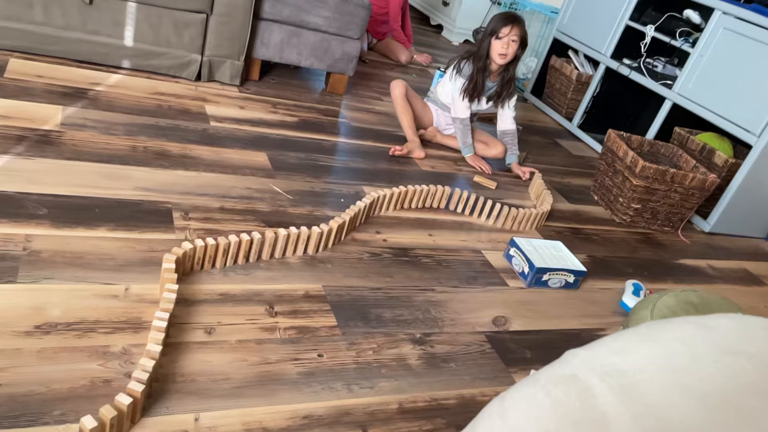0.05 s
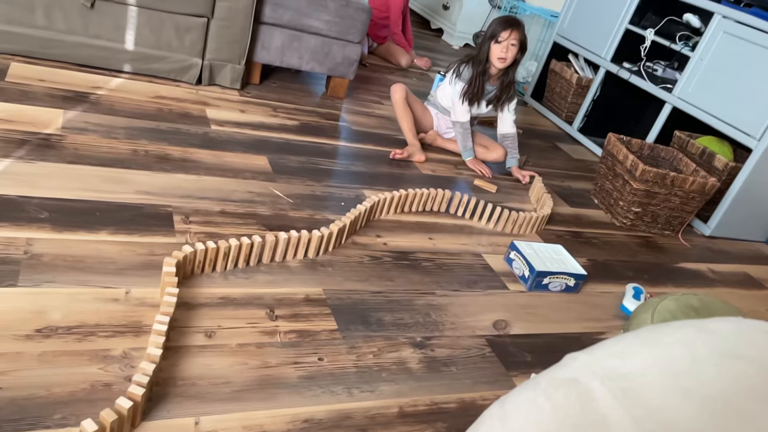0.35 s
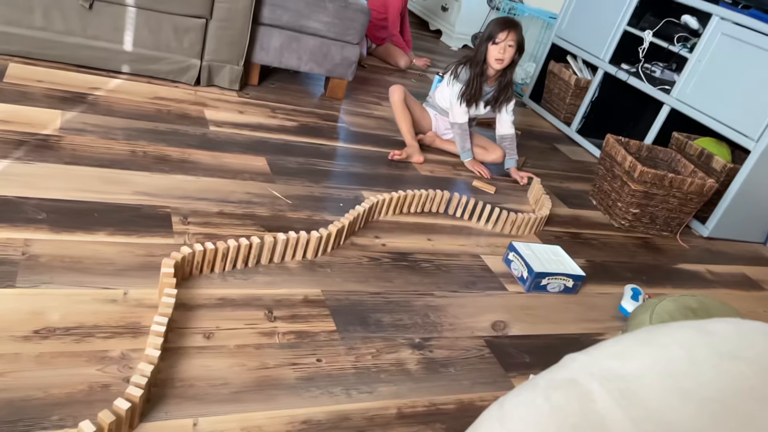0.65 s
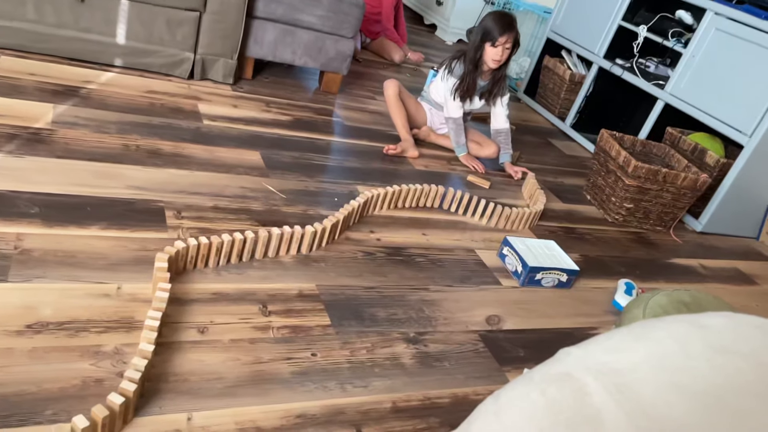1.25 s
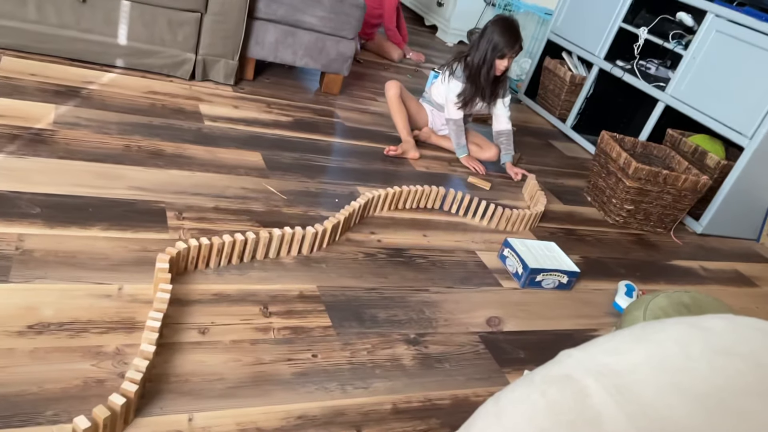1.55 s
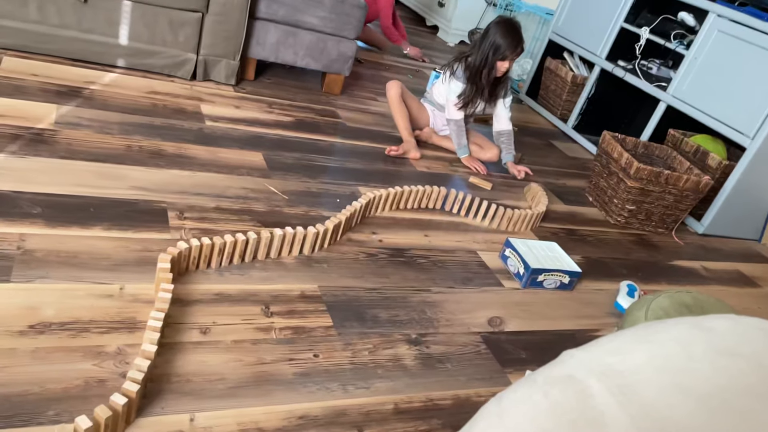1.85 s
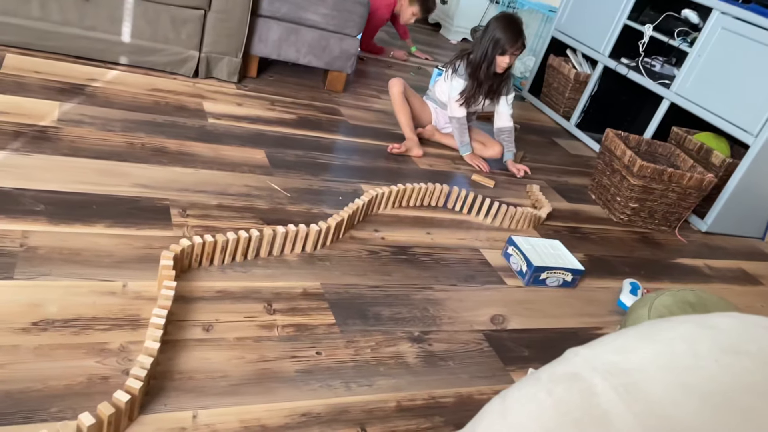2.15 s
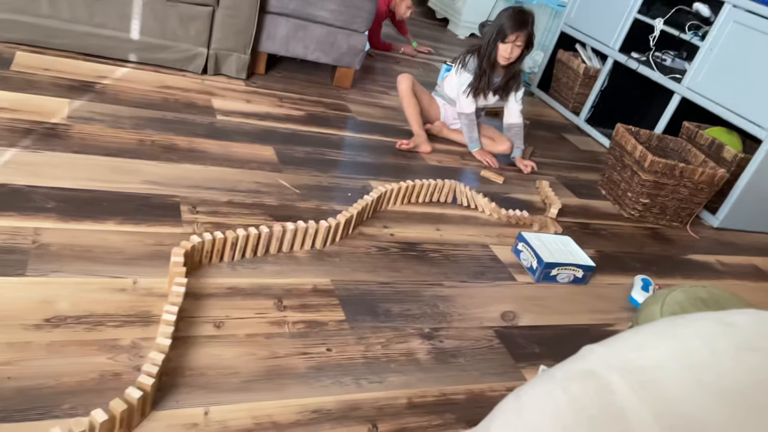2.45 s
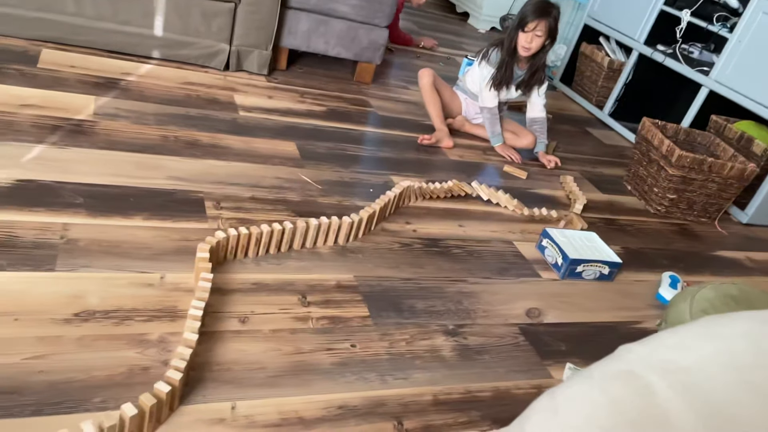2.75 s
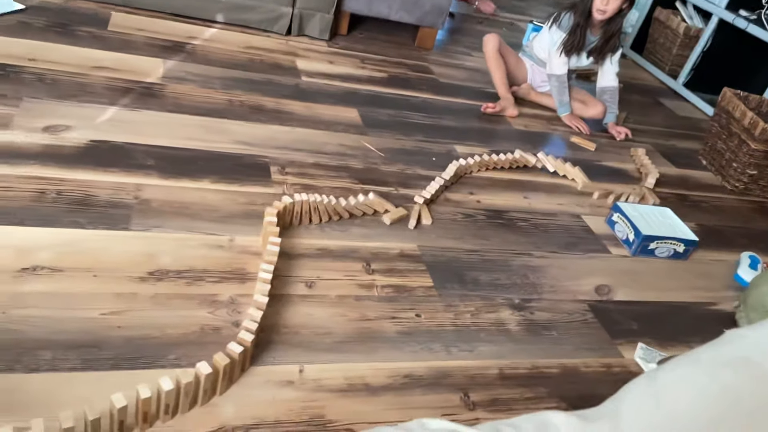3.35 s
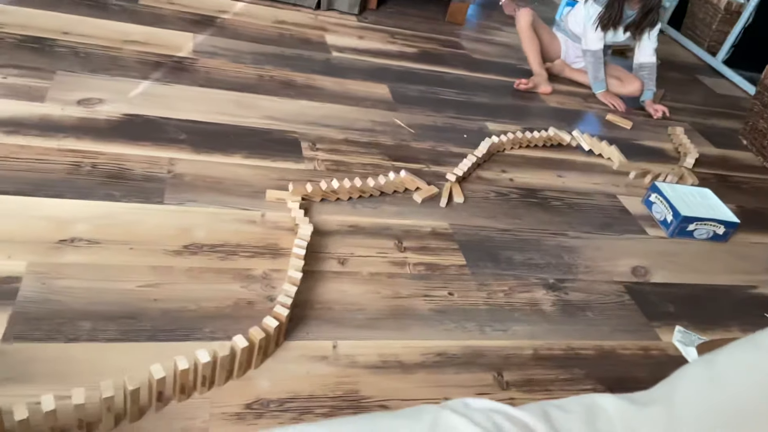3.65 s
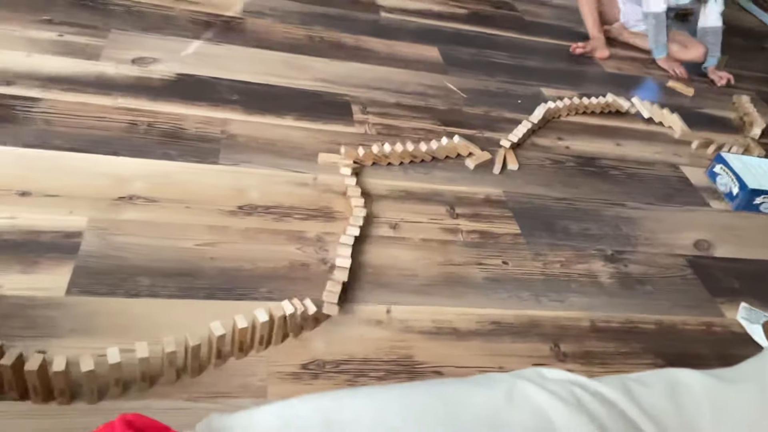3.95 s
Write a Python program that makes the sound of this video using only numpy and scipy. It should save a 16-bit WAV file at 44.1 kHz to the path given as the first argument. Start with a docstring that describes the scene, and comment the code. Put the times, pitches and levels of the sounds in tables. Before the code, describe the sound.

Wooden blocks topple in a row, clattering closer across a plank floor.

```python
"""A row of wooden blocks topples along a plank floor towards the listener in a quiet living room.
Each impact excites four damped resonances: thock of the planks, clack of the faces, ring of the block
and snap of an edge. Single knocks stand out of a growing clatter and turn drier as the row comes closer.
Far ticks come first; soft thumps, low booms and a rustle of cloth begin before the fall and recur in it.
Faint room noise and mains hum lie underneath."""
import sys
import numpy as np
from scipy import signal
from scipy.fft import rfft, irfft
from scipy.io import wavfile
from scipy.ndimage import uniform_filter1d

SR = 44100
rng = np.random.default_rng(int(sys.argv[2]) if len(sys.argv) > 2 else 0)


def generate_wav(sig):
    """Save sig (samples, or channels by samples) to the path in sys.argv[1] as 16-bit PCM at SR."""
    pcm = np.round(np.clip(np.atleast_2d(sig).T, -1, 1) * 32767).astype(np.int16)
    wavfile.write(sys.argv[1], SR, pcm)


N = 176400


def amp(db):
    """Amplitude ratio of a level in decibels."""
    return 10 ** (np.asarray(db) / 20)


def curve(t, table, column=1):
    """Linear interpolation of one table column over time."""
    table = np.array(table)
    return np.interp(t, table[:, 0], table[:, column])


def unit_rms(x):
    """Normalisation to an rms of 1."""
    return x / np.sqrt(np.mean(x ** 2))


def colour(x, spectrum, size=8192):
    """Minimum-phase filtering: folding the cepstrum gives a causal response with the given spectrum."""
    hz, db = np.array(spectrum).T
    f = np.maximum(np.fft.rfftfreq(size, 1 / SR), 1)
    gain = amp(np.interp(np.log(f), np.log(hz), db))
    cepstrum = irfft(np.log(gain))
    fold = np.r_[1, np.full(size // 2 - 1, 2), np.zeros(size // 2)]
    response = irfft(np.exp(rfft(cepstrum * fold)))
    return signal.fftconvolve(x, response[None], axes=1)[:, :N]


def diffuse_noise(size, spacing_m=0.15):
    """Diffuse-field coherence: noise at two points is alike in the bass and unrelated in the treble."""
    f = np.fft.rfftfreq(size, 1 / SR)
    coherence = 0.92 * np.sinc(2 * f * spacing_m / 343)
    mid, side = rfft(rng.standard_normal((2, size)))
    mid, side = mid * np.sqrt(1 + coherence), side * np.sqrt(1 - coherence)
    return irfft(np.array([mid + side, mid - side]), size) / np.sqrt(2)


# Spectrum of the room's rumble and hiss: frequency_hz, gain_db
AMBIENT_SPECTRUM = [(25, -25), (50, -0.5), (125, 2.5), (190, -20), (450, -21), (2450, -31.5), (2850, -26),
                    (3200, -33.5), (10000, -41.5), (15000, -68)]

def ambient_noise(t, noise_db=-67, hum_db=-73.5, hum_hz=120):
    """Stationary background: a diffuse noise floor and a pure tone of mains hum."""
    noise = unit_rms(colour(diffuse_noise(N), AMBIENT_SPECTRUM))
    hum = unit_rms(np.sin(2 * np.pi * hum_hz * t))
    return amp(noise_db) * noise + amp(hum_db) * hum


# Envelope of the shifting cloth: time_s, level_db
RUSTLE_LEVELS = [(1.226, -79), (1.243, -63.5), (1.28, -65.5), (1.3, -57), (1.395, -60), (1.43, -49.5),
                 (1.5, -57), (1.55, -54.5), (1.72, -58), (2.5, -47.5)]
# Spectrum of the cloth: frequency_hz, gain_db
RUSTLE_SPECTRUM = [(120, -23), (300, -7.5), (1000, -3), (2300, -8.5), (4500, -14.5), (7000, -23),
                   (11000, -25), (14000, -47)]

def rustle(t, flicker_db=1.95):
    """Random amplitude modulation: shifting cloth gives an uneven hiss."""
    flicker = unit_rms(uniform_filter1d(rng.standard_normal(N), size=600))
    envelope = amp(curve(t, RUSTLE_LEVELS) + flicker_db * flicker) * (t > RUSTLE_LEVELS[0][0])
    return envelope * unit_rms(colour(diffuse_noise(N), RUSTLE_SPECTRUM))


# Soft bumps of the floor and the hand-held microphones: start_s, level_db, decay_s
THUMPS = [(0.987, -54.5, 0.054), (1.321, -45, 0.045), (1.419, -44, 0.12), (2.209, -51, 0.14),
          (2.363, -48.5, 0.082), (3.373, -37.5, 0.089)]
# Spectrum of their rumble: frequency_hz, gain_db
THUMP_SPECTRUM = [(25, -8), (125, -1), (200, -8.5), (320, -10.5), (550, -16), (1200, -26), (2500, -45)]
BUMP_RISE_S = 0.019

def thumps(t):
    """Structure-borne noise: each bump swells quickly and its rumble decays exponentially."""
    envelope = np.zeros(N)
    for start, db, decay_s in THUMPS:
        age = np.maximum(t - start, 0)
        envelope += amp(db) * np.minimum(age / BUMP_RISE_S, 1) * np.exp(-age / decay_s)
    return envelope * unit_rms(colour(diffuse_noise(N), THUMP_SPECTRUM))


# Low notes of the floor: start_s, level_db, pitch_hz
BOOMS = [(1.351, -39.5, 81), (1.418, -38, 139.7), (3.38, -36, 110), (3.397, -39.5, 59)]

def booms(t, decay_s=0.041):
    """Damped free vibration: each heavy, soft bump sets one low mode of the floor ringing."""
    out = np.zeros(N)
    for start, db, hz in BOOMS:
        age = np.maximum(t - start, 0)
        envelope = amp(db) * np.minimum(age / BUMP_RISE_S, 1) * np.exp(-age / decay_s)
        out += envelope * np.sin(2 * np.pi * hz * age)
    return out


# Reverberation time of the room: frequency_hz, t60_s
ROOM_T60 = [(150, 0.37), (800, 0.49), (2500, 0.41), (6000, 0.32), (10000, 0.31), (15000, 0.088)]

def reverberation(x, tail_db=-2, build_s=0.00022, wall_db=-4.5, wall_delay_s=0.0078, wall_decay_s=0.0012):
    """Reflection and absorption: a scattered echo off the nearest wall, a tail whose treble dies first."""
    t = np.arange(SR) / SR
    log_f = np.log(np.maximum(np.fft.rfftfreq(SR, 1 / SR), 1))
    hz, t60s = np.array(ROOM_T60).T
    noise = rfft(diffuse_noise(SR))
    tail = np.zeros((2, SR))
    for weights, t60 in zip(np.eye(len(hz)), t60s):
        band = irfft(noise * np.interp(log_f, np.log(hz), weights))
        tail += band * amp(-60 * t / t60)
    tail *= 1 - np.exp(-t / build_s)
    wall = diffuse_noise(SR) * (t > wall_delay_s) * np.exp(-abs(t - wall_delay_s) / wall_decay_s)
    response = (amp(tail_db) * unit_rms(tail) + amp(wall_db) * unit_rms(wall)) / np.sqrt(SR)
    return signal.fftconvolve(x[None], response, axes=1)[:, :N]


# Small clicks across the room: start_s, level_db
TICKS = [(.384, -23), (0.396, -16.5), (1.125, -40), (1.407, -24.5)]
# Their bright spectrum: frequency_hz, gain_db
TICK_SPECTRUM = [(1000, -45), (1700, -11), (2600, -2.5), (4000, 2.5), (6500, -5), (8000, -2.5), (9800, 4.5),
                 (12500, -3), (15000, -22)]

def far_ticks(direct_db=-22):
    """Beyond the critical distance, a click is heard mostly as reverberation."""
    clicks = np.zeros(N)
    for start, db in TICKS:
        clicks[int(start * SR)] = amp(db)
    return colour(amp(direct_db) * clicks + reverberation(clicks), TICK_SPECTRUM)


# Modes of the floor planks: frequency_hz, gain_db
PLANK_MODES = [(578, -0.5), (750, -20), (876, 0), (1020, -0.5), (1128, -3.5)]

def plank_resonance(x, width_hz=19.8):
    """Forced vibration: the floor adds narrow resonances to every impact."""
    return x + sum(amp(db) * signal.lfilter(*signal.iirpeak(hz, hz / width_hz, fs=SR), x)
                   for hz, db in PLANK_MODES)


# Resonances of an impact, in the order thock, clack, ring, snap: nominal_pitch_hz, width_hz
IMPACT_MODES = [(795, 640), (2150, 1640), (4500, 2510), (9600, 5100)]
# The fall passes from right to left over different planks, drier as it nears:
# time_s, left_lag_ms, thock_pitch_ratio, thock_echo_db, faces_echo_db
PATH = [(2.3, 0.088, 1.07, 2, 1), (2.95, 0.073, 1.107, 1.5, 1.5), (3.3, -0.076, 1.14, -2, -2),
        (3.8, -0.077, 1.02, -2.5, -9)]
# Overall tone filter on the knocks, with a dip near 8 kHz and dulled treble: frequency_hz, gain_db
TONE_FILTER = [(250, 3), (420, -2), (570, 0.5), (950, -6), (1300, 1.5), (3300, 1), (5000, -0.5),
               (7300, 2.5), (8300, -10.5), (10400, -8.5), (12500, -26), (16000, -21)]

def impacts(times, mode_db, detunes, roughness_s=0.0012, size=1024):
    """Modal response: each contact excites the four damped resonances of a slightly different block."""
    f = np.maximum(np.fft.rfftfreq(size, 1 / SR), 1)
    # Rough surfaces drive the ring and the snap with a brief burst of noise.
    bursts = rng.standard_normal((len(times), size)) * np.exp(-np.arange(size) / SR / roughness_s)
    rough_forces = rfft(bursts / np.linalg.norm(bursts, axis=1, keepdims=True))
    nominal_hz, widths_hz = np.array(IMPACT_MODES).T
    orders = [4, 2, 2, 2]  # the planks swell more slowly than the faces
    out = np.zeros((3, N + size))
    for when, levels, detune, rough_force in zip(times, mode_db, detunes, rough_forces):
        start = int(when * SR)
        if start >= N:
            continue
        lag_ms, thock_ratio, thock_echo_db, faces_echo_db = (curve(when, PATH, c) for c in (1, 2, 3, 4))
        pitches_hz = nominal_hz * np.exp(detune) * [thock_ratio, 1, 1, 1]
        thock, clack, ring, snap = (amp(db) / (1 + 1j * (f - hz ** 2 / f) / width) ** order
                                    for db, hz, width, order in zip(levels, pitches_hz, widths_hz, orders))
        faces = clack + (ring + snap) * rough_force
        knock = thock + faces
        echo = thock * amp(thock_echo_db) + faces * amp(faces_echo_db)
        # The sound reaches the farther side later.
        left, right = (knock * np.exp(-2j * np.pi * f * max(ms, 0) / 1000) for ms in (lag_ms, -lag_ms))
        out[:, start:start + size] += irfft([left, right, echo])
    direct, into_room = out[:2, :N], out[2, :N]
    return colour(direct + reverberation(into_room), TONE_FILTER)


# Envelope of the leaning and sliding blocks: time_s, planks_db, faces_db
CLATTER_LEVELS = [(1.7, -37, -79), (1.95, -13.5, -28), (2.13, -10, -25.5), (2.22, -2, -20),
                  (2.29, -11.5, -21.5), (2.55, -11.5, -14.5), (2.64, -2, -21.5), (2.78, 2.5, -20.5),
                  (2.85, -3.5, -22), (2.94, 5, -14), (3.14, -4, -24), (3.4, 2, -9), (3.72, -3.5, -17),
                  (3.9, -1.5, -28), (4.0, 3.5, -12)]

def clatter(start_s=1.7, end_s=4, contacts_per_s=130, scatter_db=2.8, detune=0.09):
    """Superposition of random impacts: many light contacts merge as fallen blocks settle on each other."""
    slots = np.arange(start_s, end_s, 1 / contacts_per_s)
    draws = rng.standard_normal((len(slots), 3, len(IMPACT_MODES)))
    jitter, strength = draws[:, 0, 0], draws[:, 0, 1:2]
    mode_balance, mode_tuning = draws[:, 1], draws[:, 2]
    times = slots + jitter / contacts_per_s
    planks_db, faces_db = curve(times, CLATTER_LEVELS), curve(times, CLATTER_LEVELS, column=2)
    ring_db, snap_db = faces_db - 1.5, faces_db - 6.5
    mode_db = np.array([planks_db, faces_db, ring_db, snap_db]).T
    mode_db += scatter_db * (strength + mode_balance / 2)
    return impacts(times, mode_db, detune * mode_tuning)


# Blocks dropping flat on the floor: start_s, thock_db
LANDINGS = [(2.1627, -5), (2.4937, 1), (2.8068, -5), (3.0748, 5), (3.104, -9.5), (3.4933, -6), (3.6783, 8),
            (3.7617, 6.5), (3.835, 7.5), (3.8732, 8.5), (3.9525, 1.5), (3.994, 7)]

def landings(detune=0.09):
    """Selective excitation: a block that lands flat sounds only the dull thock of the planks."""
    times, thock_db = np.array(LANDINGS).T
    mode_db = thock_db[:, None] + [0, -np.inf, -np.inf, -np.inf]
    return impacts(times, mode_db, detune * rng.standard_normal(mode_db.shape))


# Prominent knocks and a few of their wall echoes: start_s, thock_db, clack_db, ring_db, snap_db
KNOCKS = [(1.7483, -10.5, -18, -23, -31), (1.8004, -6.5, -25, -47, -48), (1.8503, -4, -25, -43, -40),
          (1.9004, -14, -13, -10.5, -19), (1.9474, -9, -16, -18, -27), (1.976, -4, -17, -22, -36),
          (2.003, 1, -16, -17, -22), (2.0457, -2, -20, -14.5, -21), (2.0686, -5, -14, -23, -15),
          (2.149, 2.5, -30, -20.5, -20), (2.1928, 7, -31, -7.5, -14), (2.3041, 10.5, 4, 4.5, 5.5),
          (2.3747, 14, 2, -23, -22), (2.386, 6.5, -12, -20, -15), (2.4372, 8.5, 8, -5, -21),
          (2.446, 13.5, -24, -22, -21), (2.6843, 7.5, 6, 8.5, 6.5), (2.6887, 0, 5.5, -11, -13),
          (2.824, -6, -9.5, -17, -35), (2.8608, 9.5, 0, -16, -31), (2.8678, -5, -2.5, -17, -32),
          (2.8754, 12, 5, -14, -28), (2.9013, 13.5, 9, -1.5, -11.5), (2.9195, 6, 3, -5, -17),
          (2.9346, 18, 8, 0, -16), (2.956, 13, -1, -3.5, -16), (2.9898, 11, 3.5, -0.5, -11.5),
          (3.0505, 9.5, -6, -3, -7), (3.198, 5.5, -10, -20, -28), (3.2663, 13.5, 12, -8, -5),
          (3.2742, -4, 20, -2, -25), (3.2881, 16, 6, 13, 14), (3.3227, 1, -8, -14, -21),
          (3.3383, 2, 6, -16, -23), (3.375, 10, 13, 9.5, 7.5), (3.5625, 14, 11.5, 9.5, 21),
          (3.5721, 11, 3, 14.5, 4), (3.6553, 7, -21, 3, -20), (3.773, -15, -35, 3.5, -35),
          (3.8092, 5.5, -6.5, -11, -30), (3.8388, 5, -7, -3, -28), (3.8559, 5.5, -27, 1.5, -36),
          (3.8834, 2, -7, -19, -32), (3.9134, 0.5, -13, 1, -32), (3.9222, 7.5, -13, -15, -35),
          (3.984, 12, -19, -2.5, -30)]

def knocks(detune=0.025):
    """Impact excitation: toppling blocks knock, a few followed by a quick echo off the wall."""
    rows = np.array(KNOCKS)
    times, mode_db = rows[:, 0], rows[:, 1:]
    return impacts(times, mode_db, detune * rng.standard_normal(mode_db.shape))


def scene(blocks_db=0.5, right_bias_db=2):
    """Linear superposition in two channels; a level difference sets the soft sounds to the right."""
    t = np.arange(N) / SR
    blocks = amp(blocks_db) * plank_resonance(knocks() + landings() + clatter())
    ticks = far_ticks()
    soft_sounds = thumps(t) + booms(t) + rustle(t) + ambient_noise(t)
    pan = amp([[-right_bias_db / 2], [right_bias_db / 2]])
    return pan * soft_sounds + ticks + blocks


def record(dry, silent_s=0.024, cutoff_hz=16000):
    """Gating and band limiting: a moment of silence, then the sound through a steep low-pass filter."""
    gate = np.arange(N) / SR > silent_s
    lowpass = signal.ellip(8, 0.2, 70, cutoff_hz, fs=SR, output="sos")
    return signal.sosfilt(lowpass, dry * gate)


dry = scene()
out = record(dry)
generate_wav(out)
```